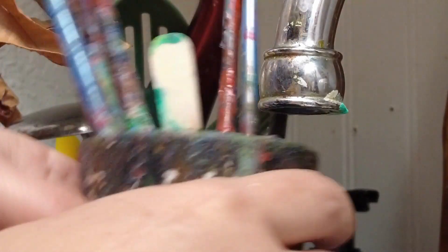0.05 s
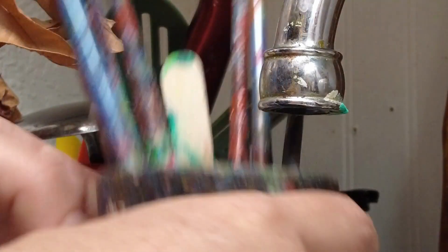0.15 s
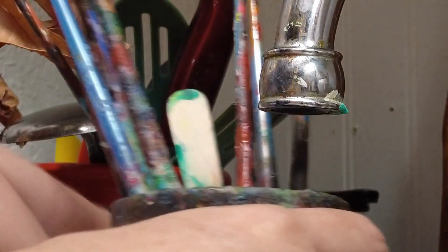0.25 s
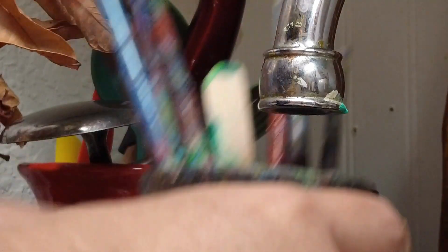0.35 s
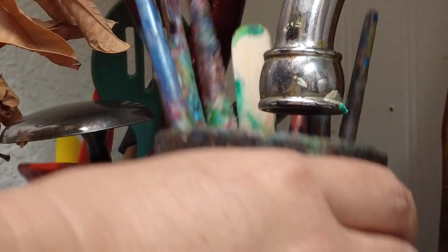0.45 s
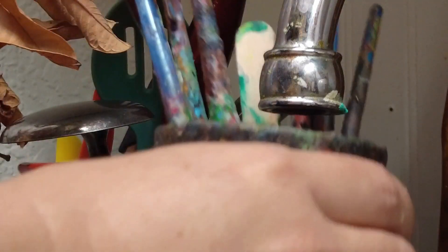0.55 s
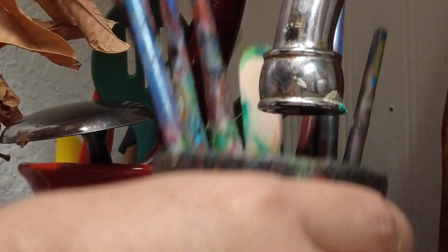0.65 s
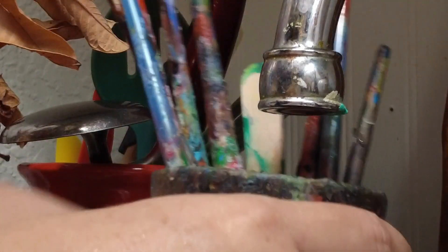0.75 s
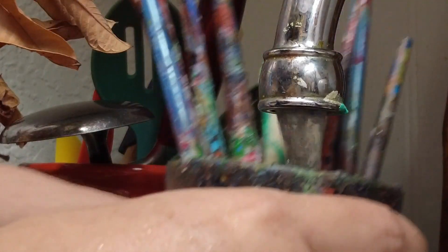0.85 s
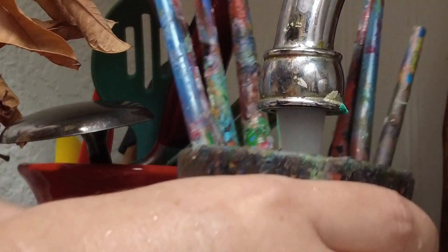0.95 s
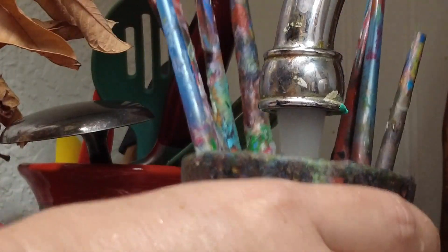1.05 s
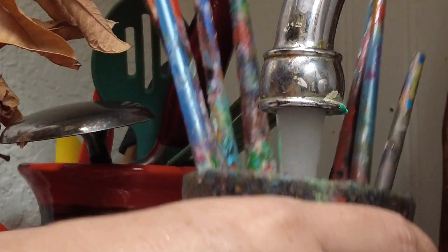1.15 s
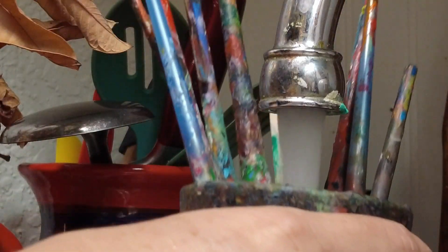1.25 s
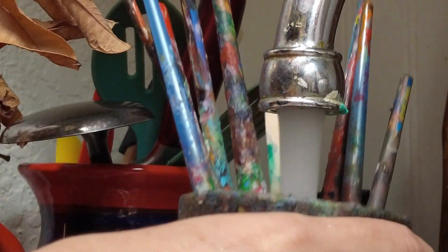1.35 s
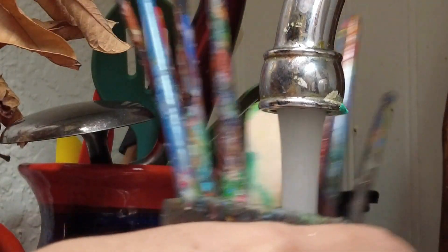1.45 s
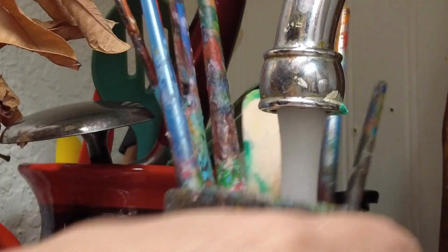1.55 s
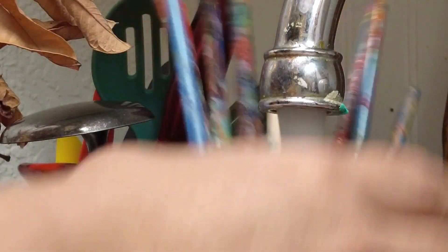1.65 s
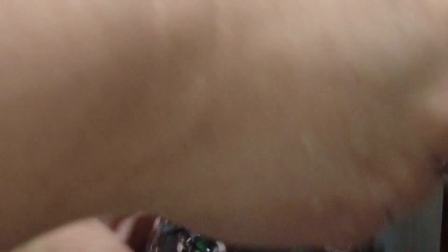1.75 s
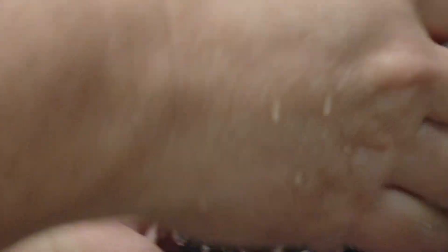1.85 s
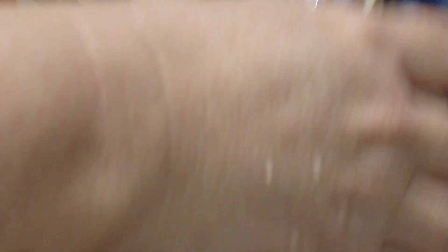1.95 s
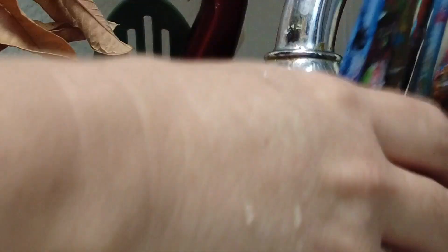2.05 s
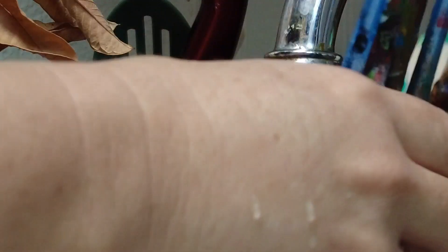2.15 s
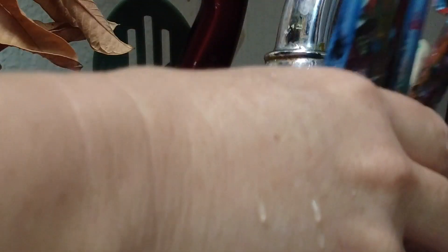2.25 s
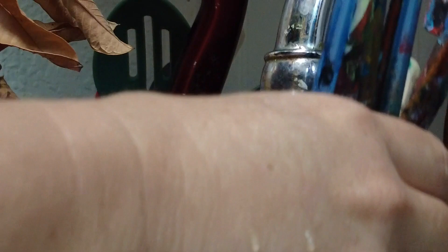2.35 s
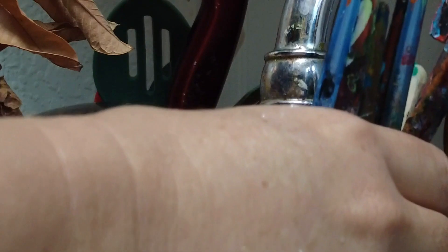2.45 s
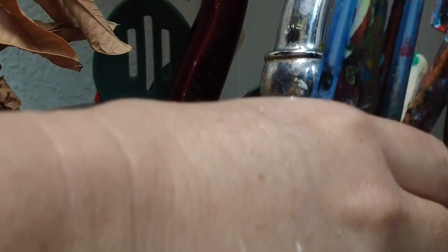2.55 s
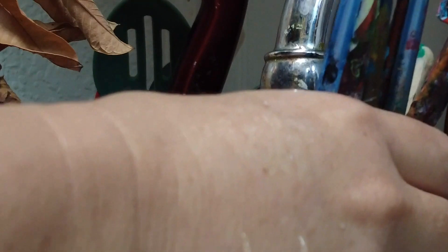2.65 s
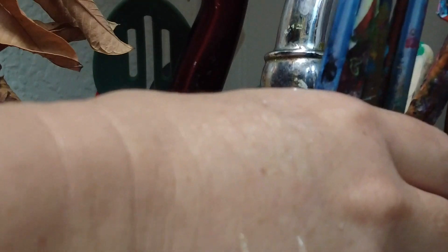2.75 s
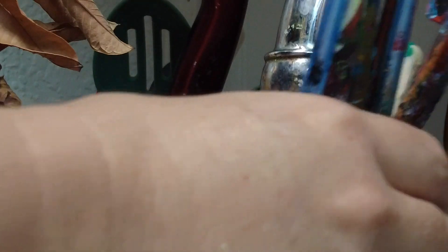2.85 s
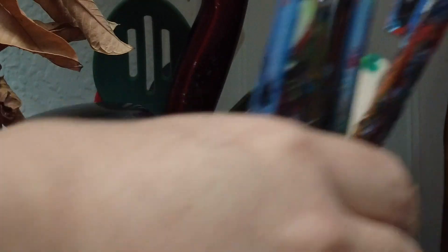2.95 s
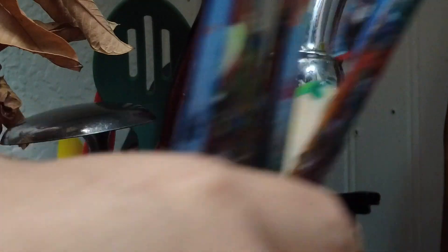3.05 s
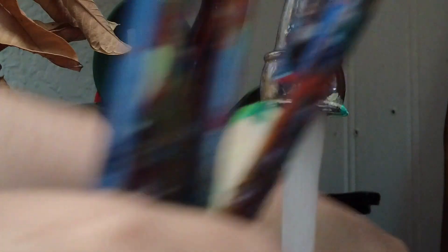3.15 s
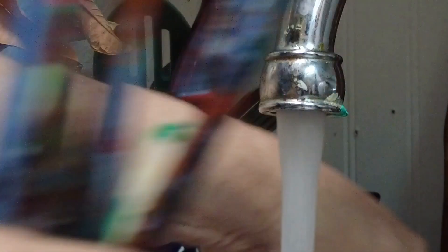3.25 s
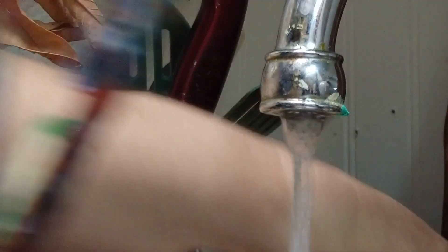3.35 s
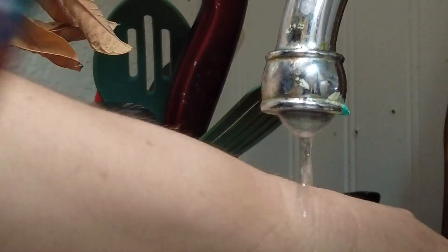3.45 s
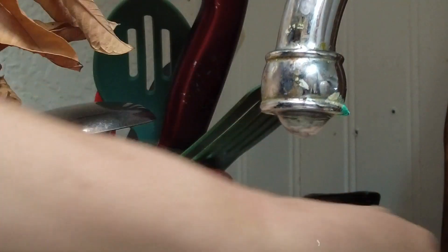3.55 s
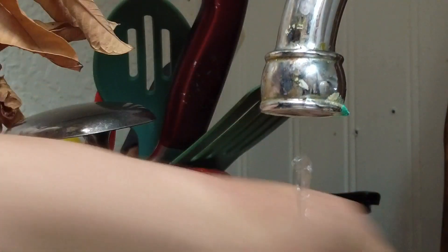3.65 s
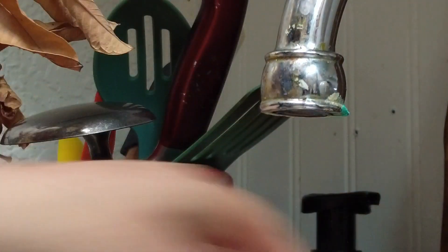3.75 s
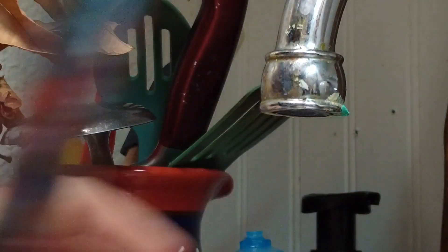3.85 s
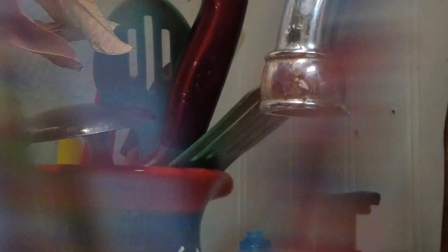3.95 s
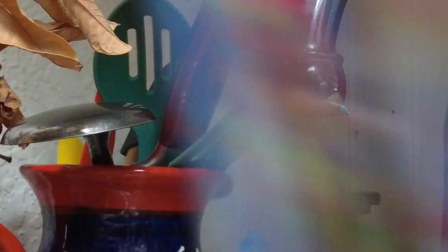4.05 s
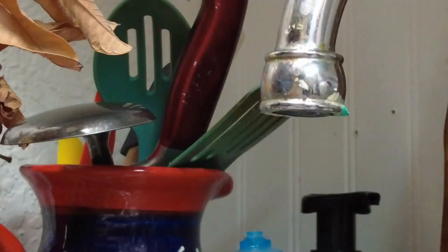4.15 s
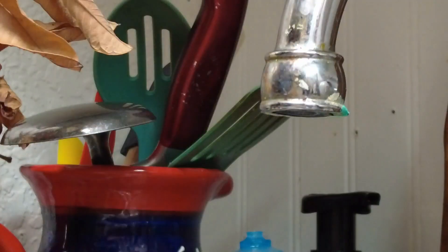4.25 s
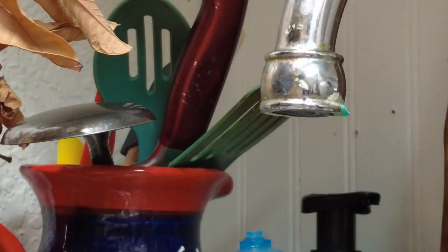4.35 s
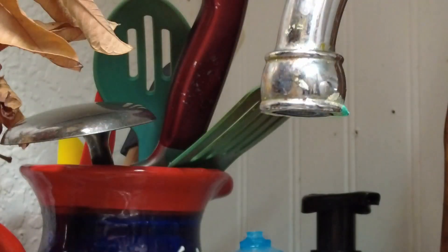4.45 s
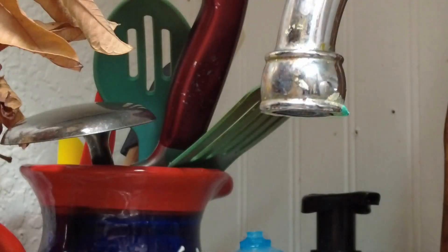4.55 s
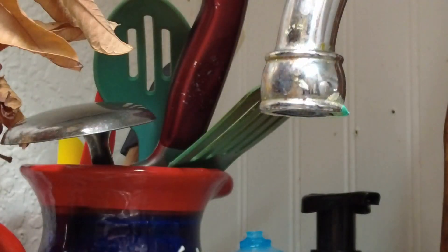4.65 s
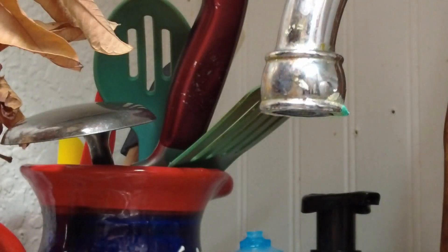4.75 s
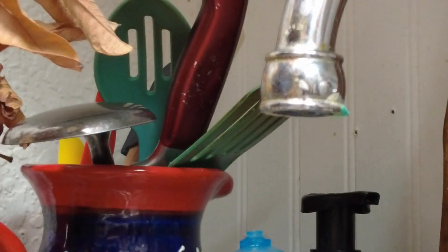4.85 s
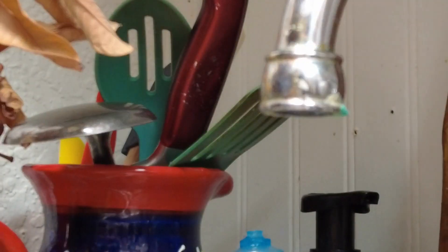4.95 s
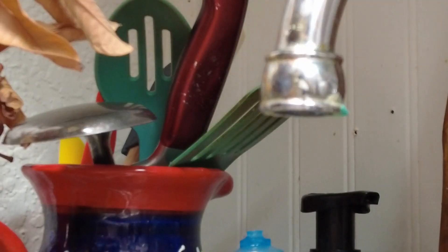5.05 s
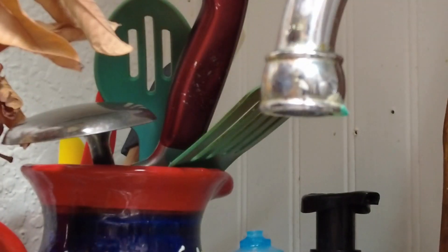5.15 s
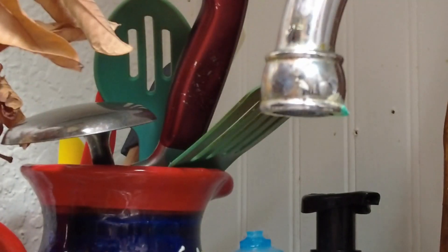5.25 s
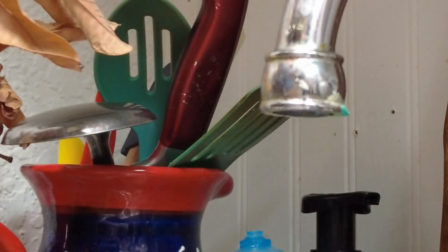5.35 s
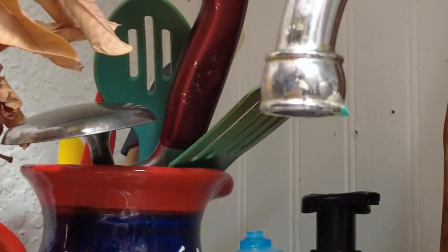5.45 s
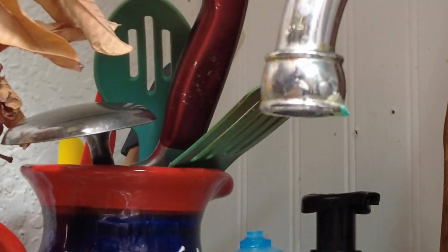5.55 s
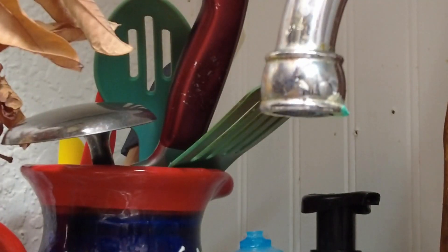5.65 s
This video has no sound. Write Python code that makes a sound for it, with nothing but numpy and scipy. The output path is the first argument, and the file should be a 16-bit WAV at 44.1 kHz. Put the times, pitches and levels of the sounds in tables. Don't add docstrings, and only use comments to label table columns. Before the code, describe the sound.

Paintbrushes clink in a jar, a tap hisses and splatters into a steel sink, then the jar thuds onto wood and squeaks along.

```python
import sys
import numpy as np
from scipy import signal
from scipy.fft import rfft, irfft, next_fast_len
from scipy.io import wavfile
from scipy.ndimage import uniform_filter1d, map_coordinates

SR = 44100
rng = np.random.default_rng(int(sys.argv[2]) if len(sys.argv) > 2 else 0)


def unload_audio(sound):
    columns = np.transpose(np.atleast_2d(sound))
    steps = np.round(np.clip(columns, -1, 1) * 32767)
    wavfile.write(sys.argv[1], SR, steps.astype(np.int16))


def natural_amplitude(level_db):
    exponent = np.asarray(level_db, float) / 20
    return 10 ** exponent


N = 251349
TIME = np.arange(N) / SR


def unit(x):
    return x / np.sqrt(np.mean(x ** 2) + 1e-20)


def along(points, hz):
    f, v = np.transpose(points)
    return np.interp(np.log(hz + 1), np.log(f + 1), v)


def curves(rows):
    s, *columns = np.transpose(rows)
    return [np.interp(TIME, s, column) for column in columns]


def during(rows):
    return np.clip(np.minimum(TIME - rows[0][0], rows[-1][0] - TIME) / 0.0137, 0, 1)


def wobble(rate):
    return map_coordinates(rng.standard_normal(int(N * rate / SR) + 4), [TIME * rate])


def filtered(x, response):
    m = next_fast_len(N + SR // 2)
    return irfft(rfft(x, m) * response(np.fft.rfftfreq(m, 1 / SR)), m)[..., :N]


def shaped(spectrum):
    return lambda hz: natural_amplitude(along(spectrum, hz))


def resonant(peaks):
    def response(f):
        total = 0
        for k, (center, width, db) in enumerate(peaks):
            peak = 1j * f * width / (center * center - f * f + 1j * f * width)
            total = total + (-1) ** k * natural_amplitude(db) * peak
        return total
    return response


def rush(response, patchy_db, spiky_db=0):
    z = signal.stft(rng.standard_normal((2, N)), nperseg=512)[2]
    field = uniform_filter1d(rng.standard_normal(z.shape[1:]), 5, 0)
    field = uniform_filter1d(field, 8, 1)
    pair = signal.istft(z * natural_amplitude(patchy_db * unit(field)), nperseg=512)[1][:, :N]
    mid, side = filtered(pair * natural_amplitude(spiky_db * wobble(350)), response)
    return np.array([mid, side]) / np.std(mid)


def ring(hz, t60, t):
    decay = natural_amplitude(-60 * t / np.clip(t60, .004, .4))
    return decay * np.sin(2 * np.pi * hz * rng.normal(1, 0.0043) * t)


def scatter():
    return rng.normal(0, 2.5)


def add(track, s, x):
    track[round(s * SR):][:len(x)] += x


def air():
    # (time [s], hum [dB], stir [dB], hiss [dB])
    background = [
        [(0.0, -46.5, -60, -61), (0.162, -43, -53.5, -59.5), (0.576, -53, -63.5, -68.5), (0.82, -45, -63, -68)],
        [(3.62, -31.5, -47, -40), (3.72, -38.5, -55, -60), (4.2, -46.5, -52, -61.5), (4.59, -49.5, -62.5, -67),
         (4.85, -43.5, -56, -59), (5.14, -50.5, -60, -62), (5.41, -48, -55, -58.5), (5.7, -44, -57, -61.5)],
    ]
    # (time [s], level [dB])
    shake = [(0.0, -44), (0.73, -41.5), (2.2, -37.5), (3.33, -45.5), (3.49, -28.5), (3.92, -47),
             (4.98, -39.5), (5.25, -48), (5.7, -42.5)]
    # (frequency [Hz], level [dB per Hz])
    rumble_spectrum = [(11, -20), (18, 2), (38, 2.5), (56, -4), (76, -25.5), (90, -14.5), (120, -31.5),
                       (200, -120)]
    fridge = [(41, -24.5), (70, 5), (89, -9.5), (161, -13), (232, -9.5), (281, -11), (674, -18), (900, -17),
              (1170, -53.5), (1980, -120)]
    stir_spectrum = [(400, -74), (800, -34), (1300, 2.5), (1470, 5), (1650, -6.5), (1850, 0), (2700, -3.5),
                     (4500, -7.5), (6000, -36.5), (12000, -74)]
    self_noise = [(2650, -36), (4500, -26), (4790, -17), (5100, 1.5), (6510, -1), (15600, -7)]
    # (frequency [Hz], level [dB rms])
    mains = [(120, -62.5), (240, -71.5)]
    hum_db, stir_db, hiss_db = curves(sum(background, []))
    rumble = natural_amplitude(curves(shake)[0] + 0.67 * wobble(8)) * rush(shaped(rumble_spectrum), patchy_db=-0.9)
    hum = natural_amplitude(hum_db - 5.43) * rush(shaped(fridge), patchy_db=5.5)
    motor = sum(natural_amplitude(db + 3 + 2.5 * wobble(6)) * np.sin(2 * np.pi * hz * TIME) for hz, db in mains)
    hum += motor * [[1], [.3]]
    stir = natural_amplitude(stir_db + 1.2) * rush(shaped(stir_spectrum), patchy_db=1.6)
    hiss = natural_amplitude(hiss_db + 1.2) * rush(shaped(self_noise), patchy_db=.6)
    return rumble + hum + stir + hiss


def whistle():
    # (time [s], pitch of the strong partial [Hz], level [dB])
    rubs = [
        [(0, 4000, -61), (.05, 4150, -46.5), (.11, 4130, -52), (.17, 4150, -67)],
        [(4.28, 4750, -61), (4.35, 4590, -54), (4.5, 4220, -60)],
        [(4.62, 4500, -61), (4.68, 4300, -50.5), (4.76, 4250, -41), (4.85, 4160, -45), (4.94, 4120, -60)],
        [(5.32, 4600, -59), (5.4, 4370, -52), (5.46, 4080, -47), (5.56, 4170, -57)],
        [(5.63, 6100, -68), (5.67, 6150, -50.5), (5.72, 6250, -48)],
    ]
    # (multiple of the pitch, level [dB])
    orders = [(.5, -10), (1, 5), (1.5, -5.5), (2, -9)]
    hz, db = curves(sum(rubs, []))
    phase = 2 * np.pi * np.cumsum(hz) / SR

    def smeared():
        return sum(natural_amplitude(level) * wobble(420 * k) * np.sin(k * phase) for k, level in orders)

    bands = np.array([smeared(), smeared()])
    return sum(during(rows) for rows in rubs) * natural_amplitude(db - 4.0) * unit(bands)


def brushes():
    # (time [s], peak [dB], ring [Hz], t60 [s], handle knock [dB], crack [dB])
    clinks = [(0.0204, -37, 4060, 0.049, 19, -13), (0.0594, -34.5, 4080, 0.15, 3, -14),
              (0.1391, -19.5, 2710, 0.041, -4, -27), (0.1604, -28, 2690, 0.041, 2, -16),
              (0.2163, -12.5, 2882, 0.077, -8, -32), (0.2346, -16.5, 2780, 0.036, -13, -28.5),
              (0.2594, -34.5, 2830, 0.044, 16, -42.5), (0.2794, -50, 2700, 0.06, 0, -44),
              (0.9882, -13.5, 3486, 0.056, -6, -21.5), (1.838, 5, 3050, 0.022, -21, -20),
              (1.933, -7, 2630, 0.045, -24, -22), (2.0038, -5.5, 3450, 0.036, -27, -13),
              (2.013, -13, 2690, 0.041, -20, -31), (2.038, -14, 2660, 0.077, -31, -26),
              (2.0518, 1, 2600, 0.068, -37, -14), (2.0715, -7, 2690, 0.078, -5, -26),
              (2.1037, -2.5, 2560, 0.091, -39, -13.5), (2.1211, -9.5, 2690, 0.039, -9, -8),
              (2.1634, -16, 1920, 0.034, -7, -31.5), (2.1867, -9, 2030, 0.056, -14, -17),
              (2.3231, -20.5, 1490, 0.18, -22, -19), (2.8432, -19.5, 1770, 0.11, -13, -35.5),
              (2.8826, -18.5, 1460, 0.089, -19, -20), (2.9283, -15, 1484, 0.14, -13, -37),
              (2.9838, -16.5, 1486, 0.11, -14, -32.5), (3.8832, -21.5, 2960, 0.055, -22, -22.5),
              (3.96, -35, 1860, 0.18, -9, -14.5), (4.1091, -23.5, 2614, 0.076, -7, -17),
              (4.1718, -29, 4210, 0.064, -20, -16), (4.1941, -25, 1520, 0.054, -34.5, -17),
              (4.2049, -13.5, 1477, 0.069, -26, -25.5), (4.2378, -22.5, 1420, 0.05, -3, -28),
              (4.2544, -30.5, 1477, 0.053, -1.5, -29), (4.7764, -33, 1456, 0.18, -1, -4),
              (5.435, -34, 2380, 0.068, -28, -11), (5.4444, -36, 1870, 0.053, -16, -6)]
    # (frequency [Hz], level [dB])
    glass = [(1460, -10), (1800, -11), (2050, -14), (2480, -10), (2735, -9), (3600, -16), (4300, -14),
             (6620, -13)]
    # (time [s], peak [dB], t60 [s])
    ticks = [
        (0.6506, -29.5, 0.1),
        (3.9194, -36, 0.046),
        (5.3844, -36.5, 0.058),
        (5.514, -38, 0.065),
    ]
    out, t = np.zeros(N + SR), np.arange(SR // 4) / SR
    bright = signal.butter(1, [900, 7000], "bandpass", fs=SR)
    for s, db, hz, t60, knock_db, crack_db in clinks:
        body = ring(hz, t60, t) + 0.43 * ring(hz * 1.022, t60, t)
        for mode_hz, level in glass:
            mode_t60 = 0.65 * t60 * (2700 / mode_hz) ** 0.52
            body += natural_amplitude(level + rng.normal()) * ring(mode_hz, mode_t60, t)
        body += natural_amplitude(knock_db) * ring(1025, 1.26 * t60, t)
        touches = rng.random(len(t)) < .03
        chatter = .17 * rng.standard_normal(len(t)) * touches * natural_amplitude(-60 * t / .1)
        chatter[0] = 1
        rung = signal.fftconvolve(body, chatter)[:len(t)]
        crack = signal.lfilter(*bright, rng.standard_normal(len(t))) * natural_amplitude(crack_db + 6.5 - 60 * t / 0.056)
        attack = 1 - np.exp(-t / 0.0014)
        add(out, s, natural_amplitude(db - 3.5) * attack * (1.734 * rung / np.abs(rung).max() + crack))
    dull = signal.butter(1, [700, 3200], "bandpass", fs=SR)
    for s, db, t60 in ticks:
        add(out, s, natural_amplitude(db - 2.5 - 60 * t / t60) * signal.lfilter(*dull, rng.standard_normal(len(t))))
    return out[:N]


def lever():
    # (time [s], peak [dB], ring [Hz], t60 [s], boom [dB], upper modes [dB])
    thumps = [(0.024, -40, 398, 0.098, -15, 4.5), (0.606, -21.5, 332, 0.12, -6, -20),
              (0.652, -31.5, 326, 0.08, 6, 0), (0.821, -24, 335, 0.23, -26, -9),
              (0.937, -11, 410, 0.096, -24.5, -7.5), (0.949, -13, 341, 0.11, -18, -11),
              (1.799, -18, 432, 0.032, -5, -11), (1.895, -18, 355, 0.13, -7, -22.5),
              (2.23, -7, 406, 0.03, -35, -49), (2.428, -29, 440, 0.046, 0, -3),
              (2.578, -22.5, 342, 0.13, -26, -2.5), (2.902, -19.5, 332, 0.08, -32, -10.5),
              (2.984, -13.5, 579, 0.071, -33, -11), (3.051, -27, 344, 0.1, -18.5, -3.5),
              (3.17, -34, 401, 0.071, -1, -17), (3.478, -0.5, 381, 0.056, -20, -9),
              (3.486, -4.5, 331.6, 0.102, -33, -19), (3.509, -24, 330, 0.051, 2, -18),
              (3.677, -47, 398, 0.067, 7.5, -8), (3.728, -42.5, 358, 0.055, -19, 1.5),
              (3.919, -38.5, 356, 0.1, -14, 1), (4.777, -43, 339, 0.1, 0, -15),
              (5.386, -48, 326, 0.097, -6, -3), (5.516, -45, 612, 0.064, -12, -6)]
    # (frequency [Hz], level [dB], t60 [s])
    steel = [(442.6, 11.5, 0.12), (658, -12, 0.16), (778, 8, 0.094), (939, 8.5, 0.074), (1160, -18.5, 0.45),
             (1600, -20.5, 0.23), (1660, -14, 0.072)]
    soft_before_s = .9
    out, t = np.zeros(N + SR), np.arange(SR // 3) / SR
    for s, db, hz, t60, boom_db, upper_db in thumps:
        upper = sum(natural_amplitude(level + scatter()) * ring(mode_hz, 0.38 * decay, t) for mode_hz, level, decay in steel)
        body = ring(hz, t60, t) + natural_amplitude(boom_db) * ring(118, 0.26, t) + natural_amplitude(upper_db - 2) * upper
        rise_s = .018 if s < soft_before_s else .003
        add(out, s, natural_amplitude(db) * (1 - np.exp(-t / rise_s)) * body)
    return out[:N]


def water():
    # (time [s], basin drone [dB], jar gurgle [dB], spatter [dB], aerator hiss [dB])
    flow = [(0.79, -70, -65, -65, -58), (0.862, -42, -35.5, -49.5, -51.5), (1.002, -40, -32, -37.5, -37.5),
            (1.05, -39, -30, -45, -41.5), (1.1, -41, -31.5, -45, -42), (1.41, -37, -31, -40.5, -37),
            (1.69, -38, -31, -37.5, -37.5), (1.71, -32, -32.5, -44, -37.5), (1.734, -31, -28, -25, -26),
            (1.81, -39, -23.5, -26, -21.5), (1.914, -31.5, -28.5, -45, -36.5),
            (2.122, -33.5, -32, -33, -34.5), (2.25, -37.5, -29.5, -43.5, -37), (2.3, -35, -32, -43.5, -37),
            (2.772, -36, -30.5, -51, -40), (3.15, -33, -33, -38, -39.5), (3.165, -42, -32, -40.5, -38),
            (3.201, -36.5, -36, -25, -17), (3.217, -36.5, -30.5, -30, -19), (3.371, -34, -31, -28.5, -21),
            (3.481, -40, -36.5, -27.5, -21), (3.613, -45, -41.5, -43, -37.5), (3.703, -57, -51.5, -73, -57),
            (3.85, -61, -81, -85, -60)]
    # (time [s], peak [dB], t60 [s], fizz [dB])
    slaps = [(1.727, -17.5, 0.055, -1), (1.7444, -20.5, 0.045, 1), (1.7794, -9.5, 0.046, 2),
             (1.795, -11, 0.038, 0), (1.814, -6, 0.035, -6), (3.1775, -6, 0.054, -21),
             (3.1936, -3, 0.05, -2), (3.2024, -22.5, 0.056, -6.5), (3.3644, -14, 0.073, -9),
             (3.3932, -6, 0.05, -24.5), (3.43, -20.5, 0.059, 5.5), (3.464, -15.5, 0.066, -8.5),
             (3.533, -21, 0.05, 4), (3.558, -13, 0.063, -26), (3.5932, -11, 0.07, -18.5),
             (3.6137, -19, 0.062, -10)]
    # (frequency [Hz], width [Hz], level [dB])
    basin = [(329.7, 28, -0.5), (397, 53, -4.5), (574, 110, -13), (122.9, 16.4, -8.5)]
    jar = [(1060, 345, -1.5), (1328, 37, -6), (1477, 20, -15.5), (1785, 32, 2.5), (1898, 63, -2.5),
           (2450, 91, -8.5), (2690, 43, -2), (3120, 33, -16), (3277, 30, -9), (4150, 150, -9),
           (4600, 90, -7.5)]
    # (frequency [Hz], level [dB per Hz])
    spatter_spectrum = [(1200, -45), (2100, -18.5), (2700, -3), (3050, 5), (3500, -4), (4500, -7),
                        (6300, -7), (7100, -17), (9000, -7), (16000, -57)]
    hiss_spectrum = [(2940, -56), (5000, -12.5), (6280, -6.5), (7140, -9), (7740, -2.5), (8970, -3.5),
                     (14600, -7), (15600, -8.5)]
    drone_db, gurgle_db, spatter_db, hiss_db = curves(flow)
    surge = .7 * wobble(14)
    drops = 1.6 * wobble(70)
    slap, fizz, t = np.zeros(N + SR), np.zeros(N + SR), np.arange(SR // 8) / SR
    for s, db, t60, fizz_db in slaps:
        burst = natural_amplitude(db - 8 - 60 * t / t60) * (1 - np.exp(-t / 0.00091))
        add(slap, s, burst)
        add(fizz, s, natural_amplitude(fizz_db) * burst)
    drone_noise = rush(lambda f: resonant(basin)(f) ** 1.32, patchy_db=4.5)
    drone = natural_amplitude(drone_db + 3 + 1.2 * wobble(20)) * drone_noise
    gurgle = natural_amplitude(gurgle_db - 0.5 + surge) * rush(resonant(jar), patchy_db=2.0, spiky_db=-1.5)
    spatter_noise = rush(shaped(spatter_spectrum), patchy_db=1.3, spiky_db=2.2)
    spatter = (natural_amplitude(spatter_db + surge + drops) + slap[:N]) * spatter_noise
    hiss_noise = rush(shaped(hiss_spectrum), patchy_db=1.1, spiky_db=1.6)
    hiss = (natural_amplitude(hiss_db + surge + .5 * drops) + fizz[:N]) * hiss_noise
    return during(flow) * (drone + gurgle + spatter + hiss)


def set_down():
    # (time [s], peak [dB], crack [dB])
    contacts = [
        (4.496, -16, -24),
        (4.509, 7.5, -33.5),
        (4.526, -8.5, -27),
        (4.539, -7, -35),
        (4.56, -12, -41.5),
        (4.584, -18, -56),
        (4.596, -19, -40),
    ]
    # (frequency [Hz], level [dB], t60 [s])
    counter = [(125, -15.5, 0.41), (365, 0.5, 0.057), (599, 0.5, 0.066), (829, -3, 0.086),
               (1136, -41.5, 0.36), (1222, -24.5, 0.26), (1254, -6, 0.11), (1400, -36, 0.2),
               (1530, -59, 0.12), (1890, -14, 0.06)]
    # (frequency [Hz], level [dB per Hz])
    thud = [(100, -39), (230, -20), (350, 0.5), (830, -1), (1050, -13), (1320, -8), (2000, -22),
            (4000, -36), (8000, -68), (15000, -81)]
    out, blows, t = np.zeros(N + SR), np.zeros(N + SR), np.arange(SR // 2) / SR
    for s, db, crack_db in contacts:
        wood = sum(natural_amplitude(level + scatter()) * ring(hz, 0.64 * t60, t) for hz, level, t60 in counter)
        crack = signal.lfilter([1], [1, -.7], rng.standard_normal(len(t)))
        crack *= natural_amplitude(crack_db + 13 - 60 * t / 0.026)
        add(out, s, natural_amplitude(db - 7) * (1 - np.exp(-t / 0.0062)) * (wood + crack))
        add(blows, s, natural_amplitude(db - 10.5 - 60 * t / 0.072) * (1 - np.exp(-t / 0.001)))
    return out[:N] + blows[:N] * rush(shaped(thud), patchy_db=2.0)[0]


def partials(hz, orders, blur_hz, beat_db):
    phase = 2 * np.pi * np.cumsum(hz) / SR
    total = np.zeros(N)
    for k, db in orders:
        flutter = natural_amplitude(db + beat_db * wobble(30))
        drift = 2 * np.pi * np.cumsum(blur_hz * wobble(90)) / SR
        total += flutter * np.sin(k * phase + drift)
    return unit(total)


def squeak():
    # (time [s], level [dB], noise share [0-1])
    push = [(4.86, -49, .98), (4.92, -42, 1), (4.98, -38.5, 0.94), (5.04, -39.5, 0.55), (5.1, -33.5, 0),
            (5.14, -39.5, 0.46), (5.2, -35, 0.05), (5.27, -40.5, 0.46), (5.32, -47, 0.34),
            (5.36, -47.5, 0.05), (5.42, -76, 0.3)]
    # (time [s], slips [per s])
    slips = [(4.86, 497), (5.0, 504), (5.1, 509), (5.2, 517), (5.27, 523), (5.42, 531)]
    # (multiple of the slip rate, level [dB])
    orders = [(2, -9), (3, -12), (4, 2), (4.9, -21), (5.9, -4), (7.9, -12.5), (9.05, -26), (9.9, -18),
              (10.85, -18)]
    # (frequency [Hz], width [Hz], level [dB])
    scuff_peaks = [(854, 28, -3), (1472, 20, 7.5), (1610, 104, -2.5), (2046, 87, 1.5), (2470, 60, -5.5),
                   (2720, 96, -3.5), (3050, 240, -4.5), (4960, 1100, -15)]
    db, share = curves(push)
    share = np.clip(share, 0, 1)
    lines = partials(curves(slips)[0], orders, blur_hz=13, beat_db=2.2)
    lines = unit(filtered(lines, lambda f: 1 + resonant([(2095, 110, 3)])(f)))
    scuff = rush(resonant(scuff_peaks), patchy_db=5.0)
    gain = during(push) * natural_amplitude(db)
    return gain * np.sqrt(1 - share) * lines, gain * np.sqrt(share) * scuff


def echoes(x):
    # (frequency [Hz], t60 [s])
    kitchen = [(200, 0.46), (1500, 0.2), (8000, 0.12)]
    hz, t, z = signal.stft(rng.standard_normal((2, SR // 2)), SR, nperseg=128)
    decay = natural_amplitude(-60 * t / along(kitchen, hz)[:, None])
    tail = signal.istft(z * decay, SR, nperseg=128)[1]
    return signal.fftconvolve(x[None], tail / np.linalg.norm(tail[0]), axes=1)[:, :N]


def joint_stereo(x, kept=0.1):
    joint_hz, tile_bins, tile_frames = 7400, 14, 3
    mid, side = (x[0] + x[1]) / 2, (x[0] - x[1]) / 2
    hz, t, z = signal.stft(side, SR, nperseg=1024)
    columns = len(t) // tile_frames + 1
    loud = np.abs(z[len(hz) // 3:, ::tile_frames]).mean(0)
    odds = kept * np.clip(np.resize(loud, columns) / np.median(loud), .15, 1.6)
    tiles = rng.random((len(hz) // tile_bins + 1, columns)) < odds
    whole = rng.random(columns) < .04
    keep = np.kron(tiles | whole, np.ones((tile_bins, tile_frames)))[:len(hz), :len(t)]
    side = signal.istft(z * np.where(hz[:, None] < joint_hz, 1, keep), SR, nperseg=1024)[1][:N]
    return np.array([mid + side, mid - side])


def scene():
    # (frequency [Hz], side against mid [dB])
    width = [(40, -17), (150, -19), (350, -10), (600, -5), (1200, -7), (2500, -5), (5000, -2),
             (12000, -1.5)]
    lines, scuff = squeak()
    near = brushes() + lever() + set_down() + lines
    both = air() + whistle() + water() + scuff + natural_amplitude(-20.5) * echoes(near)
    mid = near + both[0]
    shifted = np.imag(signal.hilbert(near))
    side = both[1] + natural_amplitude(-13.5) * echoes(near)[1] + natural_amplitude(-1.5) * shifted
    side = filtered(side, shaped(width))
    return np.array([mid + side, mid - side])


def band_limit(x):
    return signal.sosfilt(signal.butter(12, 15730, fs=SR, output="sos"), x)


def record(dry):
    clipped = dry / (1 + np.abs(dry / 1.2) ** 6) ** (1 / 6)
    mix = joint_stereo(clipped)
    return band_limit(mix)


dry = scene()
out = record(dry)
unload_audio(out)
```